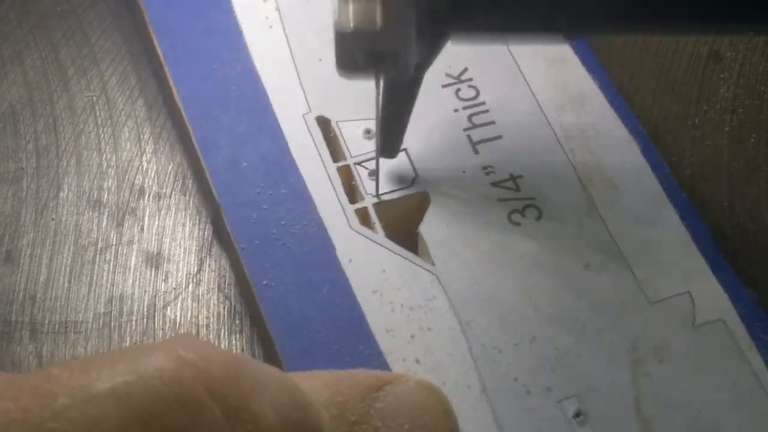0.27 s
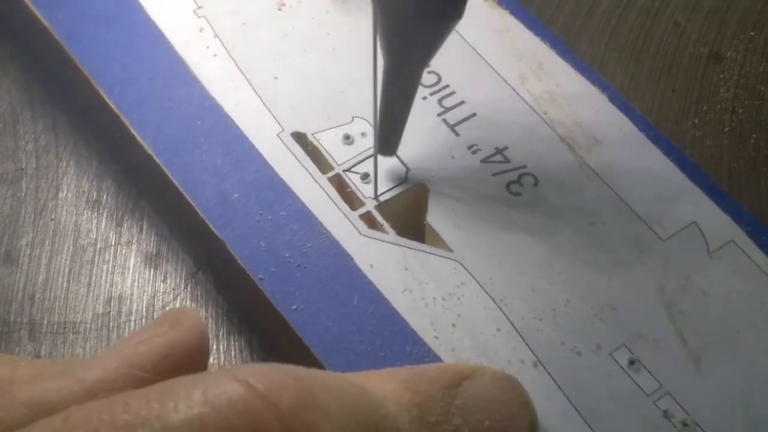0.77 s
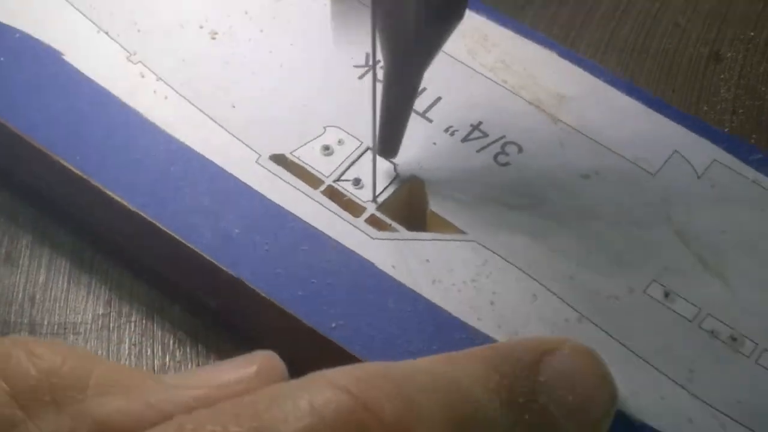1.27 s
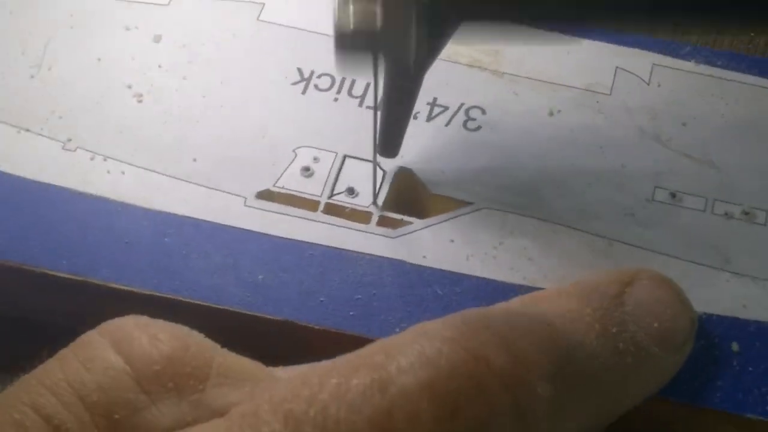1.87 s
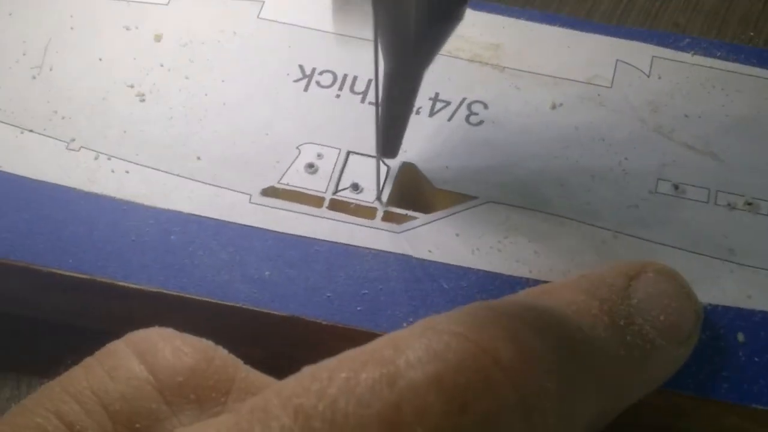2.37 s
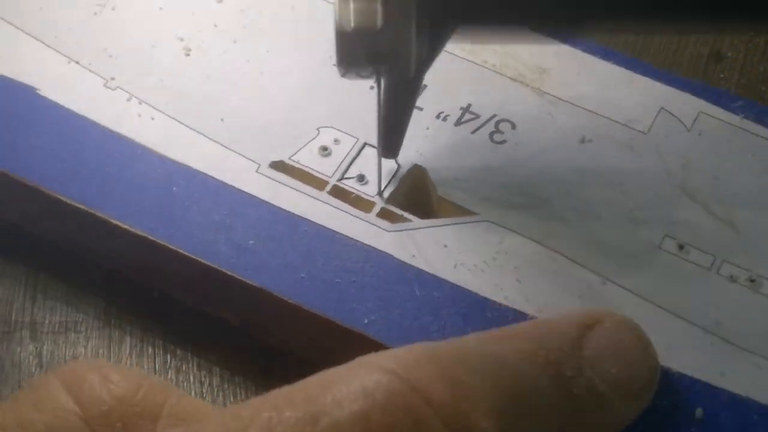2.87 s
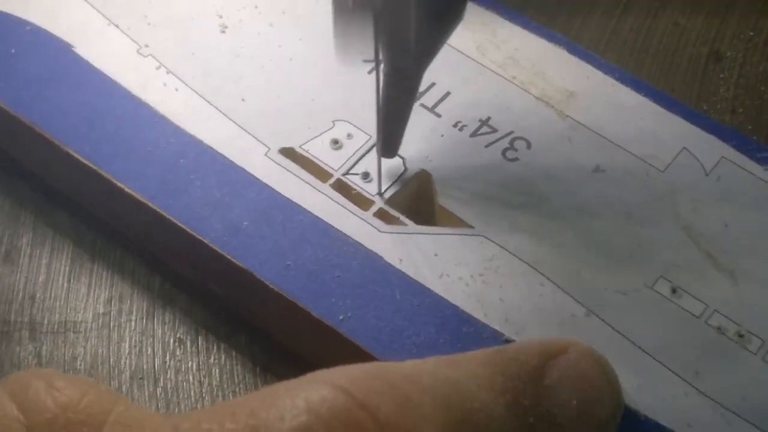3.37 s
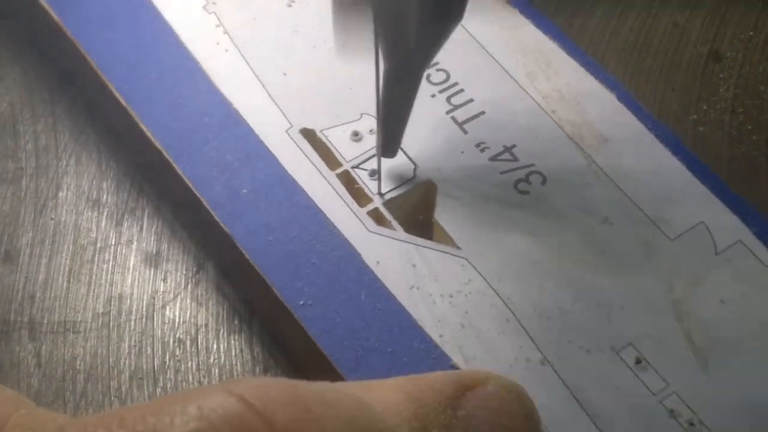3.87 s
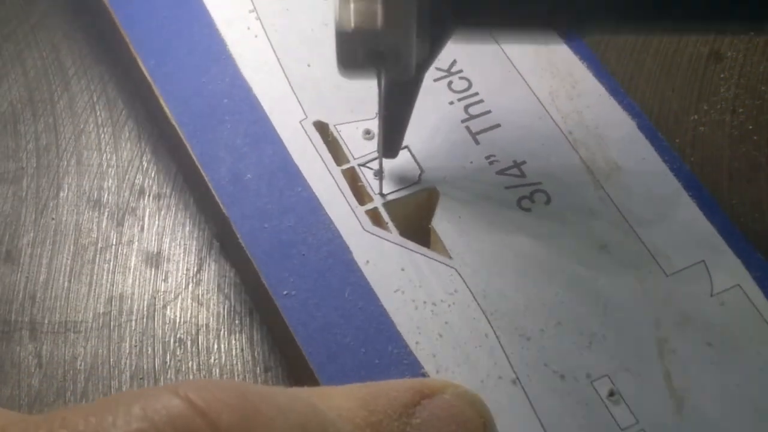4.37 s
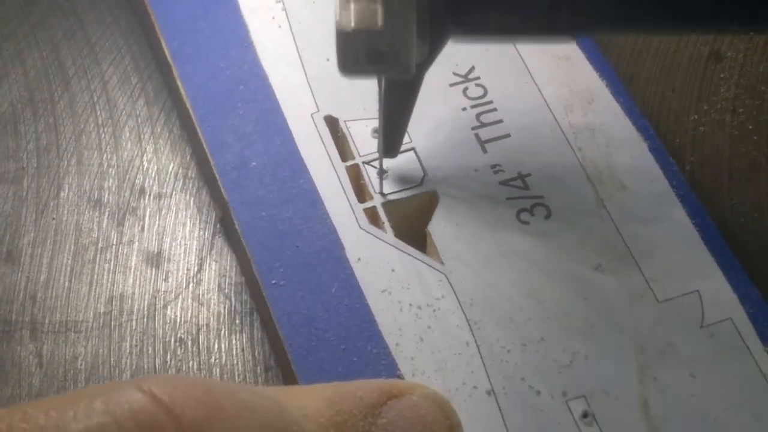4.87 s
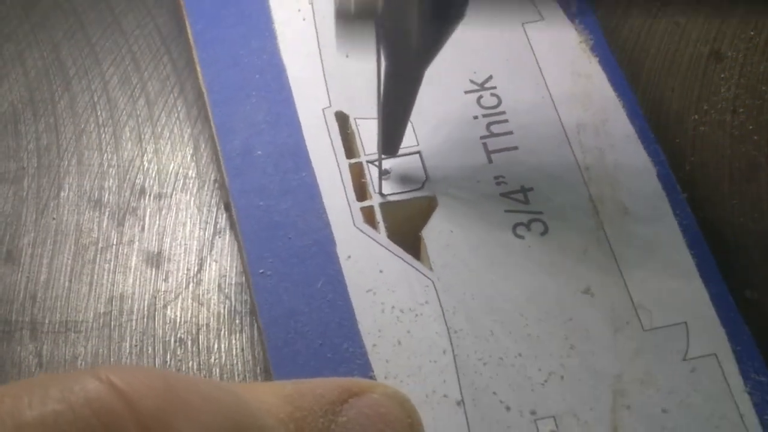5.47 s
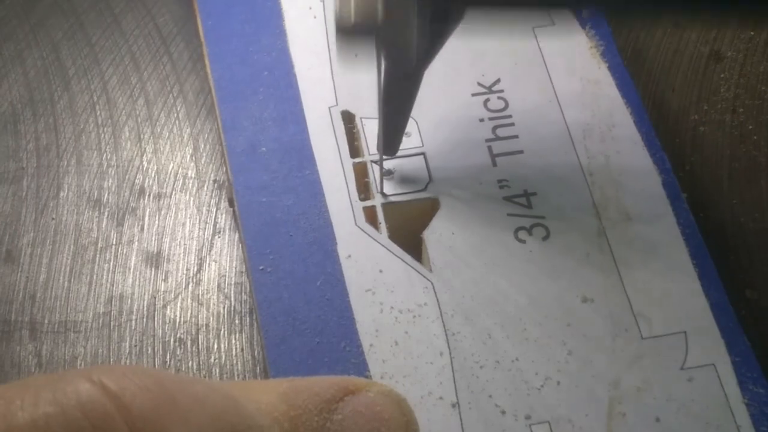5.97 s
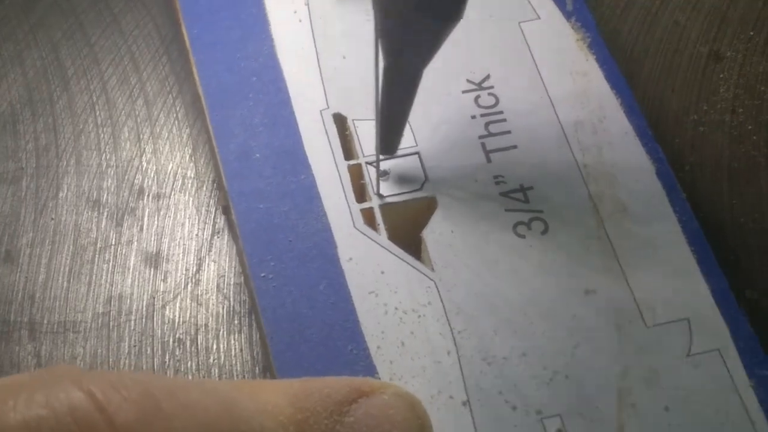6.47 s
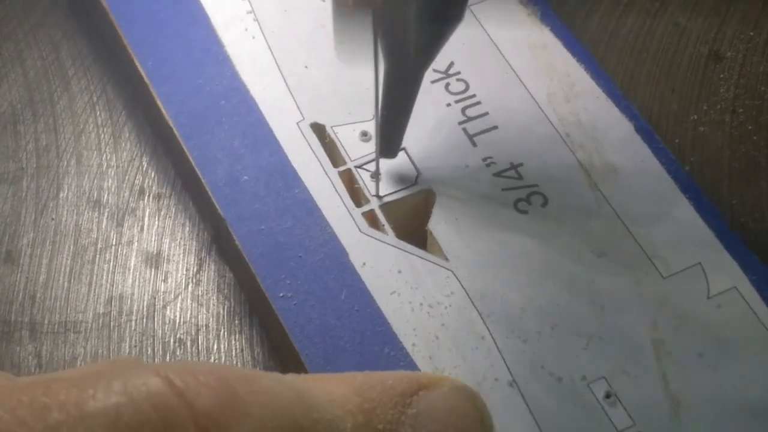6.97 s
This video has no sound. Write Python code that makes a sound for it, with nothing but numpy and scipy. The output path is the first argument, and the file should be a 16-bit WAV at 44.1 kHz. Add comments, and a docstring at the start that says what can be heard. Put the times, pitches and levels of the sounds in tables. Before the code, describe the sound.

A scroll saw heard very close, buzzing at about 22 strokes a second, chattering through a pine board, then thinning to squeaks before biting again.

```python
"""A scroll saw runs at about 22 strokes a second, heard very close, as a pine board is steered round an inside cut.
First the board is fed into the teeth: they bite, tear fibres and make it chatter and knock on the iron table.
From about 2.6 s it is mostly pivoted, so the cutting sinks while the blade rubs and squeaks in its kerf;
from about 4.2 s the feed returns, and after 6 s squeaks and short snags come forward before a last push.
Throughout, jolts of the arm hum as multiples of the crank speed and filtered noise makes the blower hiss."""
import sys
import numpy as np
from scipy import signal
from scipy.fft import rfft, irfft, next_fast_len
from scipy.io import wavfile

SR = 44100
rng = np.random.default_rng(int(sys.argv[2]) if len(sys.argv) > 2 else 0)


def unload_audio(sound):
    """Save the sound as a 16-bit wav file, at the path given as the first command line argument."""
    columns = np.transpose(np.atleast_2d(sound))
    # keep every value between -1 and 1, then stretch to whole-number steps
    steps = np.round(np.clip(columns, -1, 1) * 32767)
    wavfile.write(sys.argv[1], SR, steps.astype(np.int16))


N = 317520
TIME = np.arange(N) / SR   # s
FREQ = np.maximum(np.arange(N // 2 + 1) * SR / N, 1)   # Hz


def from_db(db):
    """Decibels to gain."""
    return 10 ** (np.asarray(db) / 20)


def rms_one(x):
    """Scale to unit rms."""
    return x / np.sqrt(np.mean(x ** 2) + 1e-20)


def in_time(rows):
    """Draw straight lines through (second, value) points, one value for every sample."""
    seconds, values = np.transpose(rows)
    return np.interp(TIME, seconds, values)


def over_hz(points):
    """Read a (Hz, value) table on a log-frequency axis."""
    hz, values = np.transpose(points)
    return np.interp(np.log(FREQ), np.log(hz), values)


def drift(rate_hz, size=N):
    """Slow chance of unit rms, its changes above rate_hz smoothed away."""
    padded = next_fast_len(size)
    hz = np.arange(padded // 2 + 1) * SR / padded
    smooth = rfft(rng.standard_normal(padded)) / (1 + (hz / rate_hz) ** 2)
    return rms_one(irfft(smooth, padded)[:size])


def colour(x, spectrum, modes=()):
    """Pass x through a body with a broad colour and resonant peaks that ring on after each blow; rms 1."""
    db = over_hz(spectrum)
    for hz, width, peak_db in modes:
        db = db + peak_db / (1 + (2 * (FREQ - hz) / width) ** 2)
    cepstrum = irfft(np.log(from_db(db)), N)
    phase = 2 * rfft(cepstrum[:N // 2], N).imag   # minimum phase: nothing rings ahead of its blow
    return rms_one(irfft(rfft(x) * from_db(db) * np.exp(1j * phase), N))


def resonate(x, hz, width):
    """One ringing resonance with gain 1 on top; a narrower width (Hz) rings longer."""
    r = np.exp(-np.pi * width / SR)
    feedforward = np.array([1, 0, -1]) * (1 - r * r) / 2
    feedback = [1, -2 * r * np.cos(2 * np.pi * hz / SR), r * r]
    return signal.lfilter(feedforward, feedback, x)


def grains(per_s):
    """Wood fibres snap at random moments with random sizes."""
    snapping = rng.random(N) < per_s / SR
    return rms_one(rng.standard_normal(N) * snapping)


# How fast the crank turns. Each row: time in seconds, speed in turns per second.
SPEED = [(0.0, 22.36), (0.3, 21.91), (0.4, 22.08), (1.3, 22.58), (1.4, 22.28), (1.8, 22.91), (1.9, 22.86),
         (2.2, 24.0), (2.5, 22.76), (3.0, 22.73), (3.3, 22.32), (3.6, 22.6), (3.8, 21.82), (4.1, 22.96),
         (4.4, 22.41), (4.5, 22.58), (4.8, 22.16), (5.0, 22.53), (5.2, 22.32), (5.6, 22.31), (5.8, 22.56),
         (5.9, 23.08), (6.4, 23.43), (6.6, 22.68), (6.8, 22.5), (7.2, 22.7)]


def crank():
    """Add up the wandering crank speed into turns made so far; one turn is one stroke."""
    return np.cumsum(in_time(SPEED)) / SR


def offset(turns, position):
    """Distance in turns from the nearest pass of a crank position."""
    return (turns - position + .5) % 1 - .5


def per_pass(turns, position=0):
    """A chance value for every pass, sliding from one to the next."""
    return np.interp(turns - position, np.arange(256), rng.standard_normal(256))


LEAN = .16   # a contact builds faster than it lets go (share of its width)


def contact(turns, position, width, uneven_db):
    """A swell once a turn, quick to rise and slower to fall, with a new strength on every pass."""
    strength = per_pass(turns, position)
    past = offset(turns, position)
    leaning_width = width * (1 + LEAN * np.sign(past))
    return np.exp(-.5 * (past / leaning_width) ** 2) * from_db(uneven_db * strength)


def stroke(turns, contacts, uneven_db):
    """Force through the turn, rms 1: a steady part and its contacts."""
    force = 1
    for position, width, db in contacts:
        force = force + from_db(db) * contact(turns, position, width, uneven_db)
    return rms_one(force)


SPELL_FADE = .3   # length of each fade, as a share of the spell


def spell(start, end):
    """Fade in, hold, fade out, each fade centred on its end of the spell."""
    inside = np.minimum(TIME - start, end - TIME)
    return np.clip(.5 + inside / (SPELL_FADE * (end - start)), 0, 1)


# How hard the board is pushed into the teeth. Each row: time in seconds, cutting noise in dB,
# of which only the swing about its mean is used.
FEED = [(0, -36), (.55, -27.5), (.95, -29), (1.25, -27), (1.52, -32), (1.72, -28.5), (2.35, -31.5),
        (2.7, -43.5), (3.1, -39.5), (3.45, -39), (3.9, -36.5), (4.3, -30.5), (5.15, -30.5), (6.0, -33.5),
        (6.15, -38.5), (6.7, -34), (6.9, -35.5), (7.2, -29.5)]


def feed_swing():
    """Harder pushing makes louder cutting: the feed's swing about its mean, in dB."""
    feed = in_time(FEED)
    return feed - feed.mean()


# Where the teeth bite. Each row: crank position in turns, width in turns, level in dB over the steady force.
BITE_STROKE = [(.14, 0.092, 1.5), (0.78, 0.14, -0.5)]
# Broad colour of the chattering board. Each row: frequency in Hz, relative level in dB.
BOARD = [(30, -16), (70, -2.5), (130, 1), (240, -3), (310, -1.5), (370, 2), (470, -1), (680, 4),
         (890, -4.5), (1300, -5), (1750, -7), (2050, -12.5), (2800, -16), (4500, -19.5), (9000, -29.5)]
# Resonances of the iron table. Each row: frequency in Hz, width in Hz, peak in dB on top of the colour.
TABLE_MODES = [(440, 120, 1.5), (737, 20, -3), (990, 60, 3.5), (1145, 30, 4), (1410, 70, 7), (2240, 220, 7),
               (3130, 830, 2.5)]
BOARD_DB, BOARD_FOLLOWS = -34, .86   # level at mean feed (dB), share of the feed's swing followed
BUZZ_ORDERS = range(15, 38)   # multiples of crank speed in the table top's buzz


def board(turns, level_db, repeat_db=-2, knocks_per_s=7000):
    """The same teeth catch at the same crank positions, fresh fibres break in between; the board rattles with both."""
    above_buzz = np.arange(1025) > BUZZ_ORDERS[-1]
    pattern = irfft(above_buzz * np.exp(2j * np.pi * rng.random(len(above_buzz))))   # one turn of catches
    teeth = rms_one(np.interp(turns % 1, np.linspace(0, 1, len(pattern)), pattern))
    pressure = stroke(turns, BITE_STROKE, uneven_db=1.0)
    bites = (from_db(repeat_db) * teeth + grains(knocks_per_s)) * pressure
    force = rms_one(bites) * from_db(level_db)
    return np.std(force) * colour(force, BOARD, TABLE_MODES)


# Where the board slaps the table in every turn. Each row: crank position in turns, relative level in dB.
SLAPS = [(.11, -0.5), (.22, -0.5), (.72, -0.5), (.87, -4)]
SLAP_JITTER_TURNS, SLAP_UNEVEN_DB = .008, 1.5   # spread of the chance in place and strength
SLAP_S = .0026   # decay time of the crunch
SLAP_DB = -3.5   # against the board's steady rattle


def slaps(turns, level_db):
    """The blade lifts the board and lets it slap down, each time a little earlier or later, harder or softer."""
    chance = rng.standard_normal((int(turns[-1]) + 1, len(SLAPS), 2))
    position, db = np.transpose(SLAPS)
    landing = np.arange(len(chance))[:, None] + position + SLAP_JITTER_TURNS * chance[..., 0]
    sample = np.searchsorted(turns, landing)
    strength = from_db(db + SLAP_UNEVEN_DB * chance[..., 1])
    hits = np.bincount(sample.ravel(), strength.ravel(), N)[:N]
    decay = signal.lfilter([1], [1, -np.exp(-1 / (SLAP_S * SR))], hits)
    force = rms_one(decay * rng.standard_normal(N)) * from_db(level_db)
    return np.std(force) * colour(force, BOARD, TABLE_MODES)


# A tooth lifts the board and drops it on the table. Each row: landing time in seconds, level in dB.
CATCHES = [(.53, -16.5), (.683, -21), (1.379, -18.5), (4.56, -22), (5.039, -18)]
# What the dropped board rings with. Each row: frequency in Hz before a few percent of chance,
# width in Hz, level in dB against the catch.
KNOCK_MODES = [(430, 90, -5), (690, 70, 0), (1150, 200, -5), (1550, 250, -6)]


def catches():
    """The board lands with a short wooden knock, a few decaying sines."""
    out, age = np.zeros(N), TIME[:SR // 10]
    for landing, db in CATCHES:
        first = int(landing * SR)
        for hz, width, mode_db in KNOCK_MODES:
            pitch = hz * rng.uniform(.95, 1.05)
            ring = np.exp(-np.pi * width * age) * np.sin(2 * np.pi * pitch * age)
            out[first:first + len(age)] += from_db(db + mode_db) * ring
    return out


LIFT_S, LIFT_LOSS_DB = .014, 7   # time off the table, loss while off it


def lifts():
    """Just before it lands the board is off the table and rattles less (dB)."""
    lifted = 0
    for landing, _ in CATCHES:
        rise = np.clip((TIME - landing + LIFT_S) / (LIFT_S / 2), 0, 1)
        lifted = lifted + rise * (TIME < landing)
    return -LIFT_LOSS_DB * lifted


# Where the tips tear. Each row: crank position in turns, width in turns, level in dB over the steady force.
RASP_STROKE = [(.15, 0.055, 2), (.9, 0.11, -2.5)]
# Broad colour of the tearing. Each row: frequency in Hz, relative level in dB.
TEETH = [(800, -74), (2500, 18), (3600, 12), (5200, 12.5), (6500, 6), (8500, 5), (10600, 6.5), (11800, 14),
         (13200, 8.5), (14200, 2)]
# Resonances of the blade. Each row: frequency in Hz, width in Hz, peak in dB on top of the colour.
BLADE_MODES = [(3476, 130, 5.5), (3920, 480, 4.9), (5970, 110, 0.67)]


def rasp(turns, fibres_per_s=14000):
    """Fine tearing at the tooth tips: snapping fibres ring the blade."""
    pressure = stroke(turns, RASP_STROKE, uneven_db=2.2)
    return colour(grains(fibres_per_s) * pressure, TEETH, BLADE_MODES)


# Where the play is taken up. Each row: crank position in turns, width in turns, level in dB over the steady part.
PLAY_STROKE = [(0.172, 0.0055, 28.6), (0.986, 0.0066, 27.1)]
# Resonances of the blade clamps. Each row: frequency in Hz, width in Hz, relative level in dB.
CLAMP_MODES = [(5000, 220, -3), (5570, 620, -7), (6885, 100, -1.5)]


def clamps(turns):
    """Play in the blade clamps ticks twice a turn and rings their metal."""
    ticks = grains(15000) * stroke(turns, PLAY_STROKE, uneven_db=2.0)
    ringing = np.zeros(N)
    for k, (hz, width, db) in enumerate(CLAMP_MODES):
        ringing += (-1) ** k * from_db(db) * resonate(ticks, hz, width)   # neighbours in opposite polarity
    return rms_one(ringing)


# Loudness at the tooth tips. Each row: time in seconds, reference level in dB for rasp and clamps.
TEARING = [(0, -40), (.5, -39.5), (1.3, -38.5), (1.7, -40.5), (2.25, -37.5), (2.5, -34), (2.7, -48),
           (3.05, -40), (3.3, -44.5), (3.85, -43), (4.55, -36.5), (5.2, -37), (5.65, -40.5), (6.3, -39),
           (6.9, -43.5), (7.2, -37.5)]
RASP_DB, CLAMP_DB = 1.5, -9   # against the tearing (dB)


def tooth_tips(turns, hardness):
    """Rasp and clamp ticks rise and fall with the tearing; only the rasp follows the wood's hardness."""
    tips = from_db(RASP_DB + hardness) * rasp(turns) + from_db(CLAMP_DB) * clamps(turns)
    return from_db(in_time(TEARING)) * tips


SQUEAK_WANDER = .3   # pitch change from stroke to stroke, as a share of the glide


def singing(turns, spells):
    """Stick and slip keeps a resonance singing; once a turn it swells and glides, part tone and part scrape."""
    out = np.zeros(N)
    for start, end, hz, width, db, position, length, glide, over_db, rough in spells:
        swell = spell(start, end)
        on = swell > 0
        size = int(on.sum())
        past = offset(turns[on], position) / length
        wander = SQUEAK_WANDER * per_pass(turns[on])
        pitch = hz * (1 + glide * (wander + past * np.exp(-(past / 2) ** 2 / 2)))
        scrape = (drift(width, size) + 1j * drift(width, size)) / np.sqrt(2)
        voice = np.sqrt(1 - rough ** 2) + rough * scrape
        tone = np.real(voice * np.exp(2j * np.pi * np.cumsum(pitch) / SR))
        pulse = stroke(turns[on], [(position, length, over_db)], uneven_db=1.3)
        out[on] += from_db(db) * swell[on] * tone * pulse
    return out


# The board groans under the teeth. Each row: start in seconds, end in seconds, pitch in Hz, scrape width in Hz,
# level in dB, crank position in turns, length in turns, glide as a share of the pitch,
# swell in dB over the ringing in between, roughness from 0 to 1.
GROANS = [(0.303, 1.0, 699, 70, -42, 0.76, 0.049, 0.064, 33, 0.6),
          (0.949, 1.6, 817, 60, -37.5, 0.83, 0.1, 0.065, 27, 0.35),
          (1.799, 2.42, 1440, 50, -33, 0.19, 0.11, -.06, 14, .3),
          (1.996, 2.419, 1690, 90, -42, .06, .04, -.04, 30, .5),
          (2.445, 3.1, 1415, 50, -43.5, .23, 0.16, -0.0301, 22, .6),
          (3.949, 4.7, 1420, 50, -42, .18, 0.075, -0.038, 31, 0.57),
          (6.799, 7.297, 1410, 50, -43.5, 0.16, 0.1, -0.035, 24, 0.58)]


def groans(turns):
    """Low stick and slip of the board against the teeth."""
    return singing(turns, GROANS)


# Where the blade rubs. Each row: crank position in turns, width in turns, level in dB over the steady force.
RUB_STROKE = [(.57, 0.13, 22.2), (.94, 0.13, 15.4)]
# Side pressure on the blade. Each row: time in seconds, rubbing in dB before the scene's rub_db and the hardness.
RUB = [(0, -44), (1.6, -43), (2.3, -40), (2.55, -46), (3.0, -38), (3.2, -34), (3.45, -38), (3.7, -43.5),
       (4.1, -41.5), (5.7, -42.5), (6.28, -35.5), (6.4, -59), (6.7, -36), (6.95, -57), (7.2, -65)]
# The blade snags in the kerf. Each row: time in seconds, added force in dB.
SNAGS = [(2.631, -28), (2.675, -25.5), (6.239, -28.5), (6.268, -30), (6.454, -28)]
SNAG_S = .003   # decay time of a snag
# Broad colour of the rubbing. Each row: frequency in Hz, relative level in dB.
KERF = [(1000, 1.5), (1750, 10), (2200, 14), (2800, -7.5), (3900, 14), (4400, 13), (5000, 2), (6300, 4.5),
        (7300, -5), (8300, 3), (9300, -2), (10700, 8), (14500, -3)]


def rubbing(turns, trim_db, slips_per_s=14000, uneven_db=4.0):
    """The twisted blade scrapes the kerf wall going up and going down, and now and then snags."""
    snags = np.zeros(N)
    for start, db in SNAGS:
        snags += from_db(db) * (TIME >= start) * np.exp(-np.abs(TIME - start) / SNAG_S)
    pressure = from_db(in_time(RUB) + trim_db) * stroke(turns, RUB_STROKE, uneven_db)
    force = grains(slips_per_s) * (pressure + snags)
    return np.std(force) * colour(force, KERF)


# The twisted blade squeaks once a turn for a spell. Each row: start in seconds, end in seconds, pitch in Hz,
# scrape width in Hz, level in dB, crank position in turns, length in turns, glide as a share of the pitch,
# swell in dB over the ringing in between, roughness from 0 to 1.
SQUEAKS = [(0, 0.76, 5750, 140, -41.5, 0.57, 0.083, 0, 17, 0.92),
           (0.5, 1.48, 3000, 220, -43.5, 0.18, 0.06, 0.0012, 28, 0.94),
           (0.86, 1.55, 2310, 69, -36, .15, 0.065, -0.0207, 25, 0.4),
           (1, 1.47, 4400, 740, -45, 0.14, 0.046, -0.00033, 27.5, 0.8),
           (1.78, 2.7, 7330, 560, -45.5, 0.63, .15, -0.023, 4, 0.93),
           (2.19, 2.45, 2600, 200, -39.5, 0.59, 0.072, 0.059, 20, 0.83),
           (2, 3.48, 10550, 400, -39.5, 0.585, 0.065, -.01, 21, 0.92),
           (2.5, 3.5, 10750, 240, -39, .95, 0.067, 0.0253, 26, 0.8),
           (2.5, 3.1, 4150, 160, -42.5, 0.63, .06, -0.0086, 8, 0.83),
           (3, 3.7, 4130, 210, -40.5, 0.62, 0.062, -0.0176, 20, .85),
           (3, 3.68, 3500, 130, -43, 0.397, 0.043, 0.0463, 32, 0.4),
           (3, 3.73, 3620, 170, -40, 0.512, 0.033, -0.014, 30, 0.4),
           (3, 3.4, 3700, 380, -40, 0.99, .05, 0.0196, 21, 0.9),
           (3.0, 4.15, 5560, 73, -44, 0.55, 0.083, -0.0011, 1, 0.93),
           (4.5, 5.0, 4900, 110, -45, 0.79, .1, 0.0026, -4, 0.8),
           (3.5, 4.9, 9940, 450, -47.5, 0.63, .2, -0.024, -1, 0.8),
           (4.5, 5.2, 4180, 250, -37, 0.58, .1, -0.0014, 6, 1),
           (5.5, 6.05, 12100, 770, -40, 0.97, 0.085, -0.017, 8, 0.9),
           (6.0, 6.82, 11500, 360, -41, 0.93, 0.061, -0.00097, 19, 1),
           (6, 6.82, 4300, 150, -35.5, 0.64, 0.075, 0, 9, 1),
           (6, 6.95, 3900, 790, -42, 0.95, 0.062, 0.00079, 27, 1)]


def squeaks(turns):
    """High stick and slip of the twisted blade in its kerf; spells may overlap."""
    return singing(turns, SQUEAKS)


# The colour of the table top's buzz. Each row: frequency in Hz, relative level in dB.
BUZZ = [(330, -3), (400, -3), (500, -3.5), (680, 0), (830, -.5)]
# Resonances of the buzz. Each row: frequency in Hz, width in Hz, peak in dB on top of the colour.
BUZZ_MODES = [(360, 22, 5), (425, 24, 7), (565, 25, 4.5), (640, 24, 4.5), (716, 20, 6)]
# Pressed a certain way, the board lets a resonance of the table top swell.
# Each row: start in seconds, end in seconds, frequency in Hz, width in Hz, level in dB.
DRONES = [(.15, .85, 341, 64, -37), (2.004, 2.465, 643, 11, -41.5), (2.03, 2.456, 713, 9.9, -43.5),
          (4.0, 5.6, 579, 27, -44.5), (4.103, 5.943, 717, 18, -43), (6.054, 6.6, 647, 13, -42.5)]
BUZZ_DB, BUZZ_FOLLOWS = -34, .85   # level at mean feed (dB), share of the feed's swing followed


def buzz(turns, level_db):
    """The higher multiples buzz in the table top, and single resonances swell for a while."""
    lines, wavers = np.zeros(N), [1 + .25 * drift(2) for _ in range(5)]
    for k, order in enumerate(BUZZ_ORDERS):
        lines += wavers[k % len(wavers)] * np.sin(2 * np.pi * (order * turns + rng.random()))
    pressed = lines * stroke(turns, BITE_STROKE, uneven_db=2)
    out = from_db(level_db) * colour(pressed, BUZZ, BUZZ_MODES)
    for start, end, hz, width, db in DRONES:
        swell, ringing = spell(start, end), resonate(lines, hz, width)
        out += from_db(db) * swell * ringing / np.std(ringing[swell > 0])
    return out


# Shaking of the frame. Each row: multiple of crank speed, relative level in dB.
FRAME_ORDERS = [(4, -5.8), (5, -2.8), (6, -9.5), (7, -.5), (8, -5), (9, -9), (10, -22), (11, -18),
                (12, -16), (14, -16)]
# Loudness of the frame's thumping. Each row: time in seconds, level in dB before HUM_DB is added.
HUM = [(0.0, -43), (0.52, -35), (1.38, -35), (1.46, -37.5), (1.72, -35.5), (2.25, -39), (2.45, -42),
       (2.69, -48.5), (3.03, -46), (3.41, -48.5), (4.31, -38), (5.19, -37), (5.94, -40), (6.3, -46),
       (7.2, -40)]
HUM_DB = 8
THUMP_AT = .4684   # crank position at which the arm jolts the frame (turns)
FRAME_RING_HZ, FRAME_RING_WIDTH_HZ = 135.1, 6.7   # the stand holds back the jolt at this pitch


def frame(turns, waver=.13, waver_hz=2.8):
    """The arm jolts the saw once a turn; the stand rings and delays the multiple that lies on its resonance."""
    out, speed = np.zeros(N), turns[-1] / TIME[-1]
    wavers = [drift(waver_hz) for _ in range(5)]
    for k, (order, db) in enumerate(FRAME_ORDERS):
        lag = np.pi + 2 * np.arctan(2 * (order * speed - FRAME_RING_HZ) / FRAME_RING_WIDTH_HZ)
        strength = from_db(db) * (1 + waver * wavers[k % len(wavers)])
        out += strength * np.cos(2 * np.pi * order * (turns - THUMP_AT) - lag)
    return from_db(HUM_DB + in_time(HUM)) * rms_one(out)


# Colour of the dust blower. Each row: frequency in Hz, relative level in dB.
AIR = [(500, -8), (5000, -26), (9000, 12.5), (10700, 15), (11900, 15), (13000, 23), (14200, 8)]


def blower(level_db):
    """Rushing air hisses steadily: coloured noise."""
    return from_db(level_db) * colour(rng.standard_normal(N), AIR)


def workshop(t60=.086):
    """Dense short reflections from table, saw body and walls smear the sound without colouring it."""
    tail = rng.standard_normal(N) * from_db(-60 * np.minimum(TIME / t60, 4))
    return np.exp(1j * np.angle(rfft(tail)))   # keep only the phase


# The far port against the near one. Each row: frequency in Hz, level in dB.
FAR_PORT = [(40, -9.4), (100, -12.4), (170, -14.8), (260, -4.1), (400, -11.5), (700, -5.6), (1200, -3.6),
            (1700, -2.2), (2100, -.3), (2700, -2.2), (3300, -.8), (3800, -3.2), (4400, -2.6), (6000, -4.0),
            (8000, -7.3), (12000, -17)]
# Sound reaching the far port directly. Each row: frequency in Hz, share from 0 to 1.
DIRECT = [(90, .85), (160, .4), (250, .6), (450, .65), (700, .84), (1050, .9), (1650, .78), (1900, .93),
          (2050, 1), (2220, 1), (2400, .92), (2700, .72), (3300, .98), (3800, .8), (4400, .93), (5700, .72),
          (7500, .3), (14000, .15)]
NEAR_ROOM_DB = -24   # scattered sound at the near port
PORT_LAG_S = .000462


def ports(x):
    """The near port faces the blade; the far one is shaded, later and inverted, so together they hollow out 2 kHz."""
    sound, direct = rfft(x), over_hz(DIRECT)
    scattered = np.sqrt(1 - direct ** 2)
    near = 1 + from_db(NEAR_ROOM_DB) * scattered * workshop()
    far = -direct * np.exp(-2j * np.pi * FREQ * PORT_LAG_S) + scattered * workshop()
    shaded = np.exp(1j * np.angle(far)) * from_db(over_hz(FAR_PORT))   # its level comes from the table alone
    return irfft(sound * np.array([near, shaded]), N)


GRAIN_DB, GRAIN_HZ = .75, 7   # hard and soft growth rings pass the blade


def scene(air_db=-48, rub_db=1):
    """One crank paces the strokes; each part of the saw has its own path to the microphone."""
    turns, feed = crank(), feed_swing()
    hardness = GRAIN_DB * drift(GRAIN_HZ)
    lift_db = lifts()
    rattle_db = BOARD_DB + BOARD_FOLLOWS * feed + hardness + lift_db
    wood = board(turns, rattle_db)
    knocks = slaps(turns, rattle_db + SLAP_DB) + catches()
    teeth = tooth_tips(turns, hardness) + groans(turns)
    kerf = rubbing(turns, rub_db + hardness) + squeaks(turns)
    body = buzz(turns, BUZZ_DB + BUZZ_FOLLOWS * feed + lift_db) + frame(turns)
    air = blower(air_db)
    return sum(ports(part) for part in (wood, knocks, teeth, kerf, body, air))


CUTOFF_HZ = 14220


def record(dry):
    """A steep low-pass takes off the top."""
    low_pass = signal.ellip(14, .1, 90, CUTOFF_HZ, fs=SR, output="sos")   # ripple and stop band in dB
    return signal.sosfilt(low_pass, dry)


dry = scene()
out = record(dry)
unload_audio(out)
```